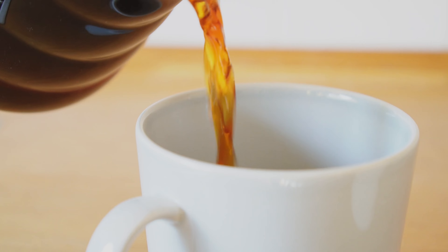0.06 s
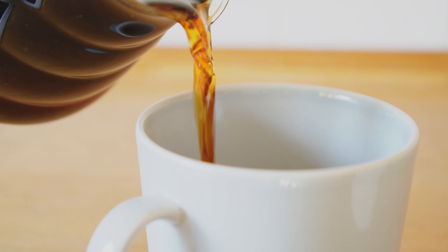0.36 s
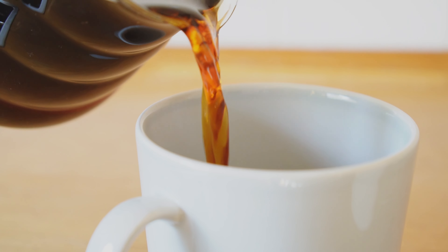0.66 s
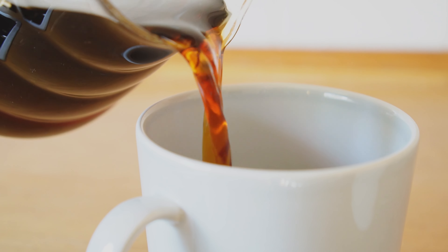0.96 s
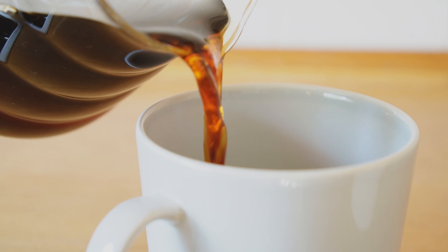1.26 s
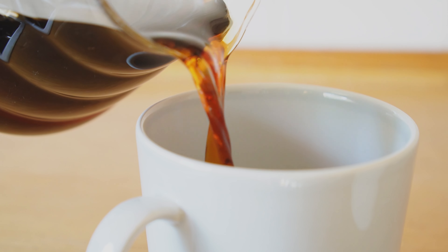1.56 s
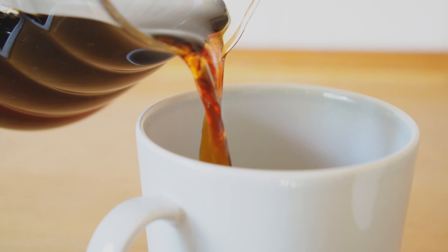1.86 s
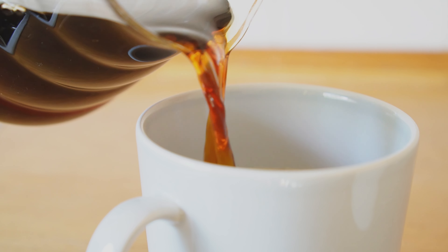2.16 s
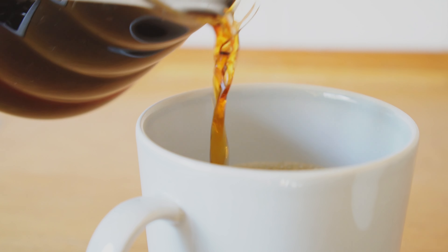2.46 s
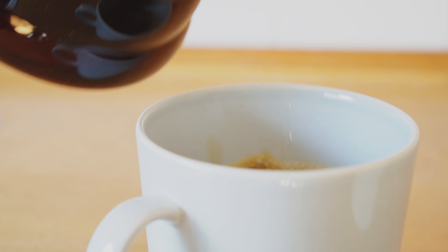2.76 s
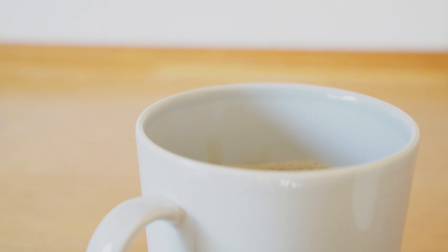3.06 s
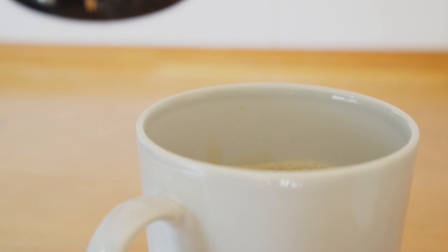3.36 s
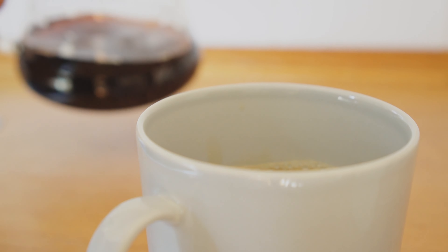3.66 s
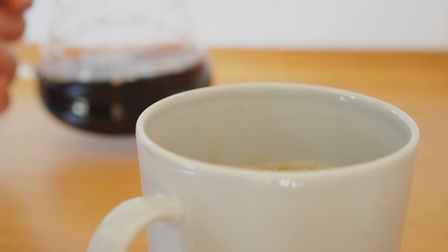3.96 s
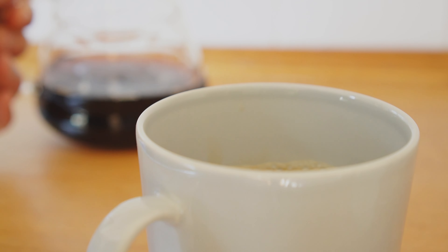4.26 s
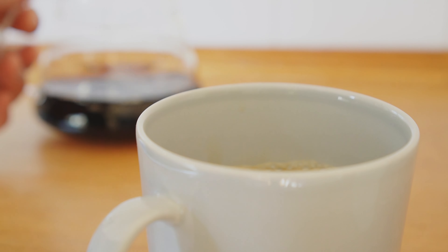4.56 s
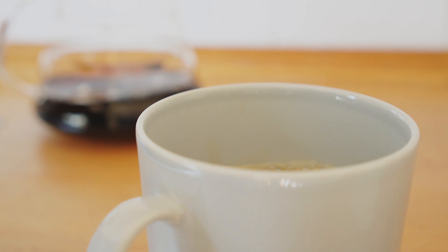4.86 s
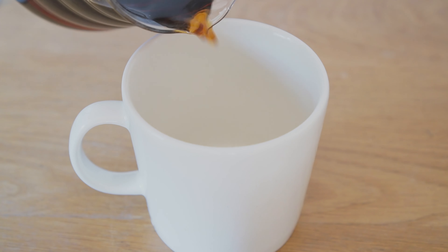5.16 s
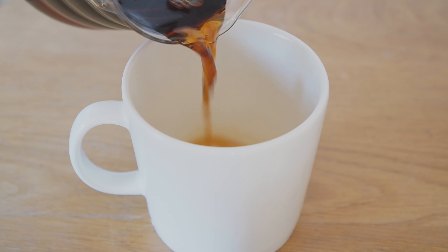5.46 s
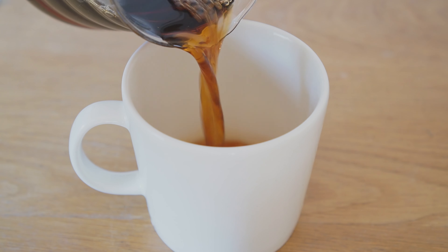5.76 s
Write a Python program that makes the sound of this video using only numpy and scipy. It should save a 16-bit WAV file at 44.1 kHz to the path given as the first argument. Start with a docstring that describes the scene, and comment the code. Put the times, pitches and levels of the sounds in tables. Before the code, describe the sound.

Coffee trickles and drips, crockery knocks twice on a wooden table, then a thin stream pours into a clinking china mug.

```python
"""Coffee trickles and drips, each drop a small splash and a ringing bubble, and sloshes once with a soft
low thump. Amid soft handling rustles, crockery is knocked twice on a wooden table and a china mug is
clinked. Then a thin stream runs from a glass jug into the mug: tiny fizzing bubbles first, larger and
lower ones as the pool deepens. A close microphone in a small, hard-walled kitchen with a steady hiss."""
import sys
import numpy as np
from scipy import signal
from scipy.fft import rfft, irfft, next_fast_len
from scipy.io import wavfile

SR = 44100
rng = np.random.default_rng(int(sys.argv[2]) if len(sys.argv) > 2 else 0)


def dump_mix(stems):
    """Bounce the given channels to the path in sys.argv[1] as a 16-bit WAV at rate SR."""
    frames = np.atleast_2d(stems).T  # one column per channel
    limited = np.clip(frames, -1, 1)  # hard clip at full scale
    pcm = np.round(limited * 32767).astype(np.int16)
    wavfile.write(sys.argv[1], SR, pcm)


N = 372204
T = np.arange(N) / SR
TOP_HZ = 16000
POUR_S, FILL_S = 5.7, 0.736  # start of the pour; time constant of the pool covering the mug's bottom


def undb(db):
    """Decibels to gain."""
    return 10 ** (np.asarray(db) / 20)


def unit(x):
    """Scale to rms 1."""
    return x / np.sqrt(np.mean(x ** 2))


def fade(t, t60):
    """Exponential decay by 60 dB in t60 seconds."""
    return np.exp(-np.log(1000) * t / t60)


def add(track, start_s, sound):
    """Mix a sound into a track at a time."""
    i = int(np.clip(start_s * SR, 0, N))
    track[i:i + len(sound)] += sound[:N - i]


def at_pitch(rows, hz, column=1):
    """One column of a table, interpolated on a log-frequency axis."""
    rows = np.array(rows)
    return np.interp(np.log(np.maximum(hz, 1)), np.log(rows[:, 0]), rows[:, column])


def colour(x, curve):
    """EQ by a curve of (Hz, dB) points."""
    size = next_fast_len(len(x) + 2048)
    gain = undb(at_pitch(curve, np.fft.rfftfreq(size, 1 / SR)))
    return irfft(rfft(x, size) * gain, size)[:len(x)]


def highpass(x, hz, order):
    """Cut the bass."""
    return signal.sosfilt(signal.butter(order, hz, "high", fs=SR, output="sos"), x)


def resonance(x, hz, width_hz):
    """Two-pole band-pass with gain 1 at the centre."""
    return signal.lfilter(*signal.iirpeak(hz, hz / width_hz, fs=SR), x)


def scatter(chance, spread_db):
    """Turn uniform draws into gains: many quiet, a few loud."""
    return undb(spread_db * np.minimum(-np.log(1 - chance), np.pi))


# Tone of the hiss and the rustles. Each row: frequency in Hz, relative level in dB.
HISS_TONE = [(30, -48), (311, -13.5), (345, -8.5), (384, -18.5), (844, -2), (1250, -2), (1500, 1.5),
             (2060, -5.5), (2290, -2.5), (3220, -9.5), (5310, -12.5), (6210, -16), (11700, -26),
             (16000, -21)]
# Soft rustles of handling. Each row: centre in seconds, half length in seconds, level in dB.
HANDLING_RUSTLES = [(.6, 0.47, -57.5), (3.682, 0.2, -60.5), (4.75, 0.24, -57.5)]
def hiss_and_rustles(hiss_db=-61):
    """Soft rustles of handling over a steady room hiss."""
    rustles = sum(undb(db) ** 2 * np.exp(-((T - s) / half) ** 2) for s, half, db in HANDLING_RUSTLES)
    return unit(colour(rng.standard_normal(N), HISS_TONE)) * np.sqrt(undb(hiss_db) ** 2 + rustles)


# The kitchen's tail. Each row: frequency in Hz, 60 dB decay time in seconds, level in dB.
ROOM_TAIL = [(100, 0.39, 5.5), (454, 0.38, 2), (1430, 0.27, -1.5), (3630, 0.39, -4.5), (9800, 0.22, -3),
             (15000, 0.32, -8)]
def reverberation(x, build_s=0.0016):
    """Hard walls return a diffuse tail: octave bands of noise, each with its own decay."""
    t = T[:SR * 3 // 4]
    spectrum, freqs = rfft(rng.standard_normal(len(t))), np.fft.rfftfreq(len(t), 1 / SR)
    tail = 0
    for hz in TOP_HZ / 2 ** np.arange(9):
        octave = np.clip(1 - abs(np.log2((freqs + 1) / hz)), 0, 1)
        band = irfft(spectrum * octave, len(t))
        decay = fade(t, at_pitch(ROOM_TAIL, hz)) * (1 - np.exp(-(t / build_s) ** 2))
        tail = tail + band * decay / np.linalg.norm(decay) * undb(at_pitch(ROOM_TAIL, hz, column=2))
    return signal.fftconvolve(x, tail)[:N]


# China sliding. Each row: start in seconds, hold in seconds, centre in Hz, level in dB.
CHINA_SLIDES = [(4.655, 0.36, 6580, -76.5), (5.079, 0.014, 6100, -52.5)]
def slides(width_hz=850, t60=0.31):
    """China rubs over china with a thin, high hiss."""
    out = np.zeros(N)
    for s, hold, hz, db in CHINA_SLIDES:
        rub = unit(resonance(rng.standard_normal(N), hz, width_hz))
        out += undb(db) * rub * (T > s) * fade(np.maximum(T - s - hold, 0), t60)
    return out


def ring(modes, detune=0.0044, twin_gain=0.044):
    """A struck object rings; nothing is perfectly round, so each mode beats with a close twin."""
    out, t = 0, T[:SR]
    for k, (hz, db, t60) in enumerate(modes):
        phase = 2 * np.pi * hz * t
        pair = np.sin(phase) + twin_gain * np.sin((1 - detune) * phase)
        out = out + (-1) ** k * undb(db) * fade(t, t60) * pair
    return out / (1 + twin_gain)


# Modes of the table top. Each row: pitch in Hz, relative level in dB, 60 dB decay time in seconds.
WOOD_MODES = [(333, -33, 0.52), (480, -24, 0.43), (513, -9, 0.24), (693, -4.5, 0.075), (734, -9, 0.1),
              (894, -6, 0.14), (1070, -16, 0.25), (1294, -5, 0.11), (1432, -8, 0.16)]
# Tone of the thud. Each row: frequency in Hz, relative level in dB.
THUD_TONE = [(40, -54), (157, -31.5), (313, 0.5), (609, 3.5), (683, 3.5), (1160, -4), (1360, 8.5),
             (2470, -10.5), (2830, -7), (3250, -12), (5380, -22.5), (12000, -35), (15600, -45),
             (22000, -120)]
# First the soft low thump of the coffee's slosh, then blows on the table.
# Each row: start in seconds, level in dB, pitch in Hz, thud in dB against that level.
THUMPS = [(.608, -33, 1200, -13.5), (4.158, -15, 870, -14.5), (4.583, -44, 1160, -5),
          (4.5957, -14, 933, -14)]
def thumps(push_s=0.00098, wood_db=-19, thud_t60=0.15):
    """A slosh thumps softly; a blow bends the table top, then spreads into its modes and a thud."""
    out, t = np.zeros(N), T[:SR]
    for s, db, hz, thud_db in THUMPS:
        push = np.sin(2 * np.pi * hz * t) * t / push_s * np.exp(1 - t / push_s)
        body = unit(colour(rng.standard_normal(SR), THUD_TONE))
        thud = body * fade(t, thud_t60) * (1 - np.exp(-t / push_s))
        add(out, s, undb(db) * (push + undb(wood_db) * ring(WOOD_MODES) + undb(thud_db) * thud))
    return highpass(out, 160, order=2)


# Modes of the crockery. Each row: pitch in Hz, relative level in dB, 60 dB decay time in seconds.
JUG = [(2100, 4, 0.02), (2740, -9, 0.13), (2788, -4, 0.17), (3480, -15.5, 0.057), (4700, -19, 0.066),
       (5306, -14.5, 0.036), (5700, -15.5, 0.038), (8240, -27, 0.073)]
POT = [(2995, -2.5, 0.13), (4196, -12, 0.12), (5410, -2, 0.044), (5600, -11, 0.065), (7600, -14, 0.14),
       (9030, -17, 0.091)]
LID = [(2257, 8, 0.13), (3260, 3, 0.12), (5640, -2, 0.087), (6480, -1, 0.08)]
MUG = [(1975, -10, 1), (2113, 0.5, 0.79), (2340, 15, 0.014), (3747, -2, 0.19), (3787, 3.5, 0.13),
       (4130, 6, 0.048), (7160, -20, 0.088), (540, 7, 0.015), (1390, 7.5, 0.0075)]
FULL_MUG = [(2060, 3, 0.95)]  # the filled mug rings on with one slightly lower note
SPOUT = [(8650, 0.019, 0.12)]
# First the broad splash of the coffee's slosh, then crockery hits. Each row: start in seconds, object,
# ring level in dB, then the noise burst's level in dB, centre in Hz and 60 dB decay time in seconds.
SLOSH_AND_CLINKS = [(0.611, POT, -70, -48, 2600, 0.4), (2.302, POT, -55.5, -59, 4300, 0.8),
                    (4.157, JUG, -24.5, -39.5, 3270, 0.075), (4.555, POT, -50, -53, 5270, 0.076),
                    (4.583, POT, -35.5, -45, 5440, 0.11), (4.595, POT, -41, -36.5, 2600, 0.039),
                    (4.801, LID, -50, -57, 4900, 0.053), (5.658, MUG, -41.5, -36, 4700, 0.029),
                    (5.873, SPOUT, -33, -39, 8300, 0.094), (8.299, FULL_MUG, -51.5, -52, 2870, 0.074)]
def slosh_and_clinks(relative_width=0.72):
    """Coffee sloshes with a broad splash; hard edges scrape and set glass or china ringing."""
    out, t = np.zeros(N), T[:SR]
    for s, modes, ring_db, burst_db, hz, t60 in SLOSH_AND_CLINKS:
        width_hz = relative_width * hz
        band = resonance(resonance(rng.standard_normal(SR), hz, width_hz), hz, width_hz)
        burst = unit(band) * fade(t, t60)
        add(out, s, undb(ring_db) * ring(modes) + undb(burst_db) * burst)
    return highpass(out, 200, order=2)  # small things radiate no bass


def bare(t):
    """How exposed the mug's bottom is to the stream: 1 as the pour starts, towards 0 as it fills."""
    return (t >= POUR_S) * np.exp(-abs(t - POUR_S) / FILL_S)


def filling(on_china, in_pool):
    """Glide from a value on bare china to a value in a deep pool as the mug fills."""
    return in_pool + (on_china - in_pool) * bare(T)


def bubble(born_s, hz, cycles, soft=True, steady_hz=2330, pop_gain=0.2, pop_cycles=9):
    """A bubble pinches off with a pop and rings: more cycles if small, fewer in a thin film."""
    ring_s = cycles * (1 - bare(born_s) / 2) * (hz / steady_hz) ** 0.4 / hz
    t = T[:int(ring_s * SR) + 2]
    # Bubbles above steady_hz bend up, those below sink; all rise more in a thin film.
    bend = 0.02 * np.log2(hz / steady_hz) + 0.61 * bare(born_s) ** 2
    pitch = hz * 2 ** (bend * 2 * np.tanh(hz * t / 20))
    audible = np.clip((TOP_HZ - pitch) / 2000, 0, 1)
    attack_s = 0.00035 if soft else 0.00008
    attack = 1 - np.exp(-(t / attack_s) ** 2)
    decay = fade(t, ring_s) + pop_gain * fade(t, pop_cycles / hz)
    return np.sin(2 * np.pi * np.cumsum(pitch) / SR) * attack * decay * audible


def swarm(start_s, end_s, per_s, low_hz, high_hz, skew, scatter_db, per_clump, clump_s=0.008, cycles=35):
    """Random splashes each shed a clump of bubbles; more skew favours low ones. Rms 1 while it runs."""
    span_s = end_s - start_s
    when, height, loud, life, lag = rng.random((int(per_s * span_s), 5)).T
    clump = np.arange(len(when)) // per_clump
    times = start_s + when[clump] * span_s + lag * clump_s
    low, high = (np.interp(times, T, np.broadcast_to(hz, N)) for hz in (low_hz, high_hz))
    pitches = low * (high / low) ** (height ** skew)
    gains = scatter(loud[clump], scatter_db)
    out = np.zeros(N)
    for s, hz, gain, ring_cycles in zip(times, pitches, gains, cycles * (.5 + life)):
        add(out, s, gain * bubble(s, hz, ring_cycles))
    return unit(out) * np.sqrt(span_s * SR / N)


# Hollow tone of the vessel under the trickle and under the pour.
# Each row: centre in Hz, width in Hz, relative level in dB.
TRICKLE_CAVITY = [(1590, 100, 6), (2904, 200, 13.5)]
POUR_CAVITY = [(1006, 140, 14.2), (2037, 90, 9.9), (2900, 360, 12.7), (3830, 220, 10.3), (4480, 120, 8.9)]
def vessel(x, pouring, direct_gain):
    """The air above the liquid rings along, changing the tone but not the level."""
    cavity = POUR_CAVITY if pouring else TRICKLE_CAVITY
    hollow = direct_gain * x + sum(undb(db) * resonance(x, hz, width) for hz, width, db in cavity)
    return hollow * np.std(x) / np.std(hollow)


# Surges in the flow. Each row: time of full strength in seconds, hold in seconds, level in dB.
FLOW_SPURTS = [(0, 0.015, -49.5), (0.53, 0.14, -53.5), (6.442, 0.056, -46.5), (6.703, 0.07, -46),
               (7.02, 0.33, -55), (7.446, 0.096, -47.5), (8.04, 0.062, -48)]
def flow(even_db, attack_s=0.081, t60=0.16):
    """Strength of the bubbling: an even flow plus spurts that swell, hold and die away."""
    power = undb(even_db) ** 2
    for s, hold, db in FLOW_SPURTS:
        swell = np.clip((T - s) / attack_s + 1, 0, 1)
        release = fade(np.maximum(T - s - hold, 0), t60)
        power = power + (undb(db) * swell * release) ** 2
    return np.sqrt(power)


def crackle(start_db=-58, fall_db_per_s=6):
    """While the trickle is still lively, small bubbles crackle above it."""
    bubbles = swarm(0, 1.8, per_s=150, low_hz=3300, high_hz=11000, skew=1.8, scatter_db=4, per_clump=2)
    return bubbles * undb(start_db - fall_db_per_s * T)


def trickle(even_db=-59, fall_db_per_s=2, trim_db=1):
    """A soft, dense dribble of bubbles that dies away."""
    bubbles = swarm(0, 2.68, per_s=1400, low_hz=1092, high_hz=6710, skew=1.1, scatter_db=2.5, per_clump=2)
    bubbling = undb(trim_db) * vessel(bubbles, pouring=False, direct_gain=1.9)
    return bubbling * flow(even_db - fall_db_per_s * T)


def ticks(per_s=45, hz=11500, t60=0.00047, start_db=-32, fall_db_per_s=15):
    """Tiny bubbles burst at the surface with bright ticks, most strongly while the pool is shallow."""
    out, t = np.zeros(N), T[:SR // 200]
    tick = np.sin(2 * np.pi * hz * t) * fade(t, t60)
    when, loud = rng.random((int(per_s * T[-1]), 2)).T
    for s, gain in zip(when * T[-1], scatter(loud, spread_db=6)):
        add(out, s, gain * tick)
    return out * (T > POUR_S) * undb(start_db - fall_db_per_s * abs(T - POUR_S))


# Drops that stand out. Each row: start in seconds, bubble pitch in Hz, level in dB,
# splash in dB against that level; bubble and splash each get a trim below.
ACCENT_DROPS = [(.002, 836, -39.5, 1.5), (0.09, 2850, -42.5, 4), (.128, 808, -34.5, 3.5),
                (.1405, 630, -41, -2), (0.146, 1700, -41, 1), (.266, 1680, -37.5, -11),
                (.459, 4340, -37.5, -34), (0.5095, 5100, -36.5, -26), (0.5386, 1245, -35, -8),
                (0.6184, 1180, -29.5, -21), (.758, 4150, -37.5, -33), (0.819, 2730, -38, -7),
                (.866, 5480, -36, -35), (.901, 5030, -38, -27), (0.915, 3170, -31, -32),
                (1.003, 5540, -35, -32), (1.2658, 2960, -36, -7), (1.321, 2970, -38, -14),
                (1.544, 2950, -29, -17), (1.544, 10300, -37.5, -4), (1.6226, 1280, -40, -15.5),
                (1.8335, 1300, -39, -7), (2.19, 1890, -41.5, -5), (2.2068, 2240, -42.5, -5),
                (2.4777, 2000, -37, -1.5), (2.5308, 3700, -38.5, -6), (2.5543, 1260, -27.5, -5),
                (2.5845, 2430, -25, -6.5), (2.6055, 1790, -28, -9.5), (2.639, 2800, -37, -5),
                (2.676, 3900, -40, -9), (2.6974, 1594, -20.5, -8), (2.7046, 1470, -27.5, -35),
                (2.716, 1450, -34, -27), (2.7035, 4600, -30, -13), (2.726, 4500, -41, -6),
                (2.814, 1653, -24, -7.5), (5.7391, 6000, -31, -6), (5.772, 8040, -33, -11),
                (5.8392, 7340, -33.5, -5.5), (5.8721, 3800, -27.5, -5), (5.886, 7400, -29.5, -5),
                (5.9295, 5860, -34, -3), (6.051, 10600, -34, -13), (6.15, 7000, -29, -16),
                (6.196, 4750, -35, -14), (6.236, 3860, -35, -23), (6.27, 1940, -41, 0.5),
                (6.183, 2540, -36.5, -2.5), (6.319, 2790, -38, -15.5), (6.383, 6360, -39, -16),
                (6.732, 7700, -36.5, -11), (5.9479, 2860, -29.5, -3.5), (6.0196, 5840, -36.5, -2),
                (6.1169, 10100, -23, -10), (6.161, 8350, -23.5, -23), (6.1814, 6870, -27, -13),
                (6.4017, 3640, -32.5, -14), (6.415, 2710, -27, -30), (6.428, 2040, -39, -8),
                (6.448, 1870, -32, -15.5), (6.469, 2780, -38, 3), (6.546, 2880, -37.5, 0.5),
                (6.605, 3940, -33.5, -14), (6.662, 2440, -30, -5.5), (6.7244, 3140, -27, -7.5),
                (6.7917, 2530, -29, -1), (6.881, 2510, -26.5, -18), (6.962, 4080, -31, -33),
                (6.994, 2860, -32, -11), (7.091, 2050, -51.5, 11.5), (7.2162, 3000, -34, -21),
                (7.307, 1560, -35, -4.5), (7.3375, 1120, -28.5, -8), (7.436, 1670, -40, -5),
                (7.437, 4230, -36, -23), (7.512, 3000, -25, -18), (7.508, 10500, -33, -12),
                (7.548, 1290, -40, -18), (7.559, 1276, -28.5, -5), (7.581, 8270, -46.5, -0.5),
                (7.65, 4190, -28, -20), (7.748, 1028, -33.5, -36), (7.83, 1260, -39, -6),
                (7.978, 1330, -42, 4), (7.984, 5650, -39, -2.5), (8.234, 1025, -38.5, -17.5),
                (8.05, 2870, -26, -28), (8.0769, 3220, -29.5, -32), (8.284, 1010, -31, -8.5),
                (8.311, 980, -31, -8)]
def drops(plink_trim_db=0.5, splash_trim_db=-3, splash_t60=0.03, gentle_db=-16):
    """Each drop slaps the surface, which rings the air in the vessel, and leaves one ringing bubble."""
    out, t = np.zeros(N), T[:SR // 20]
    for s, hz, db, splash_db in ACCENT_DROPS:
        band = signal.butter(2, [0.87 * hz, hz + 3600], "band", fs=SR, output="sos")
        slap = unit(signal.sosfilt(band, rng.standard_normal(len(t)))) * fade(t, splash_t60)
        splash = vessel(slap, pouring=s >= POUR_S, direct_gain=1.46)
        plink = bubble(s, hz, cycles=40, soft=splash_db < gentle_db)  # gentle drops slip in softly
        add(out, s, undb(db + plink_trim_db) * highpass(plink, hz / 2, order=4))
        add(out, s, undb(db + splash_db + splash_trim_db) * highpass(splash, hz / 2, order=4))
    return out


def pour(bubbling_db=-2, rise_s=0.23):
    """The spurting stream fizzes on bare china, then drags ever larger bubbles into the pool."""
    bubbles = swarm(POUR_S, T[-1], per_s=330, low_hz=filling(3470, 890), high_hz=6500,
                    skew=0.95, scatter_db=4.2, per_clump=3)
    spray = swarm(POUR_S, T[-1], per_s=120, low_hz=4740, high_hz=filling(12900, 7000),
                  skew=0.89, scatter_db=4.5, per_clump=3)
    bubbling = undb(bubbling_db) * vessel(bubbles, pouring=True, direct_gain=1.5)
    fizz = undb(filling(on_china=18.5, in_pool=-30.5)) * spray
    stream = flow(even_db=filling(-63, -53.5)) * np.clip((T - POUR_S) / rise_s, 0, 1)
    return (bubbling + fizz) * stream


def coffee(wall_db=3):
    """Drops and bubbles have no bass, least of all in the narrow mug, whose wall sings in one mode."""
    liquid = drops() + trickle() + crackle() + pour() + ticks()
    pouring = T > POUR_S
    dribble = highpass(liquid * ~pouring, 540, order=5)
    in_mug = highpass(liquid * pouring, 850, order=8)
    wall = resonance(in_mug, hz=MUG[0][0], width_hz=6)
    return dribble + in_mug + undb(wall_db) * wall


# Stereo width of the tail, hiss and rustles. Each row: frequency in Hz, side gain in dB.
STEREO_WIDTH = [(100, -22), (500, -8.5), (1000, -9), (2000, -7), (4000, -6.5), (12000, -0.5)]
def scene(pan=0.02, coffee_send_db=-2, thump_side_db=-8):
    """Coffee, crockery and table sit near the centre, inside a wider reverberation."""
    liquid, bright, low = coffee(), slosh_and_clinks() + slides(), thumps()
    direct = liquid + bright + low
    to_walls = undb(coffee_send_db) * liquid + bright  # the mug beams its liquid at the microphone
    mid = direct + reverberation(to_walls + low) + hiss_and_rustles()
    wide = reverberation(to_walls + undb(thump_side_db) * low) + hiss_and_rustles()
    side = colour(wide, STEREO_WIDTH) + pan * direct
    return np.array([mid + side, mid - side])


def record(dry, bass_hz=75, treble_db=-7):
    """The microphone loses the deep bass and dulls the top octave; the recorder cuts the rest."""
    thinned = highpass(dry, bass_hz, order=2)
    dulled = np.array([colour(channel, [(12300, 0.033), (15000, treble_db)]) for channel in thinned])
    return signal.sosfilt(signal.ellip(10, .2, 70, TOP_HZ, fs=SR, output="sos"), dulled)


dry = scene()
out = record(dry)
dump_mix(out)
```